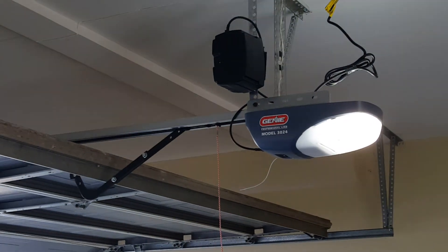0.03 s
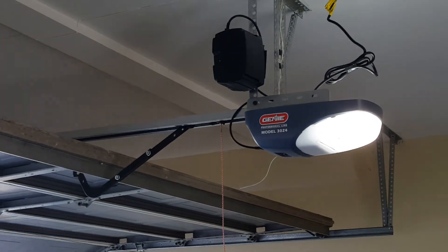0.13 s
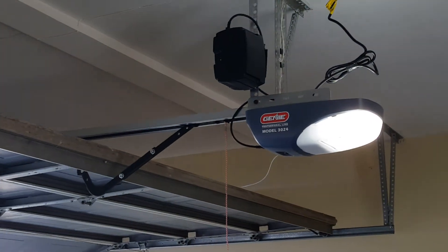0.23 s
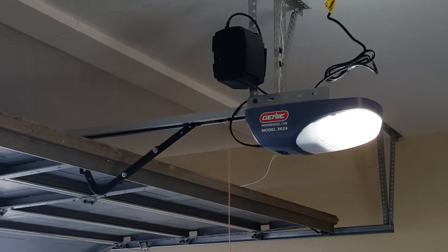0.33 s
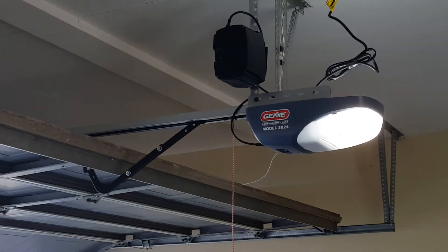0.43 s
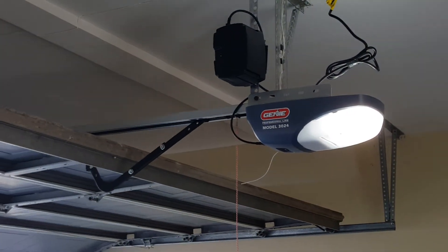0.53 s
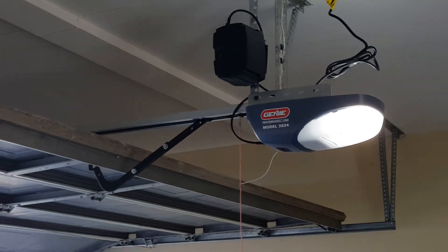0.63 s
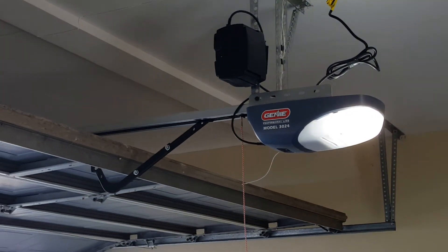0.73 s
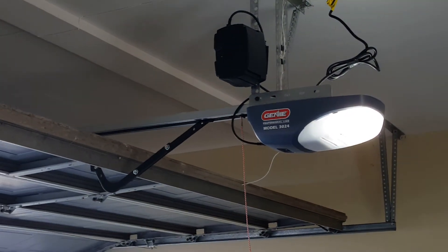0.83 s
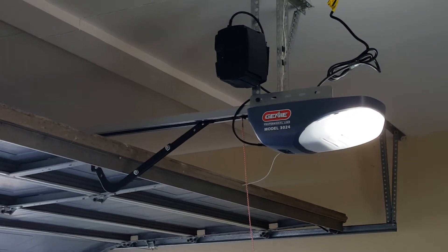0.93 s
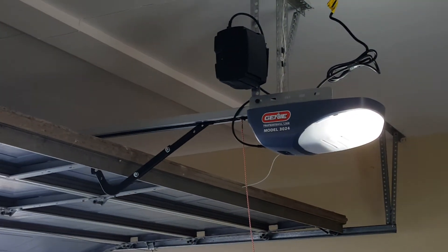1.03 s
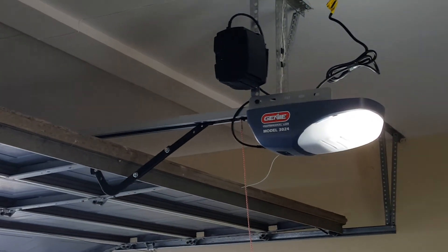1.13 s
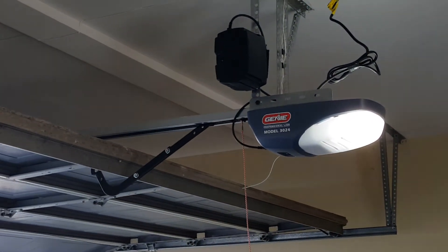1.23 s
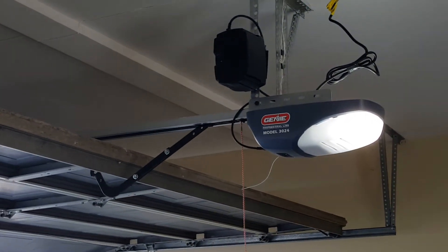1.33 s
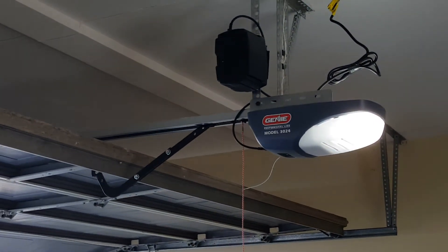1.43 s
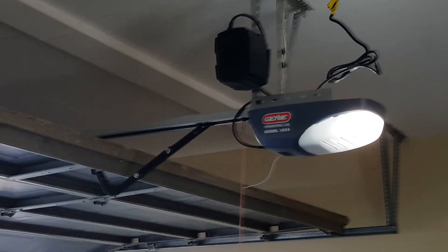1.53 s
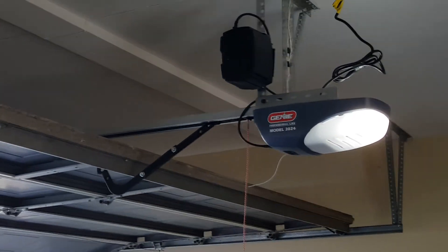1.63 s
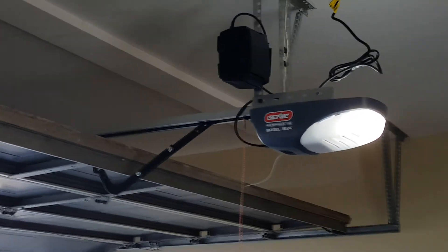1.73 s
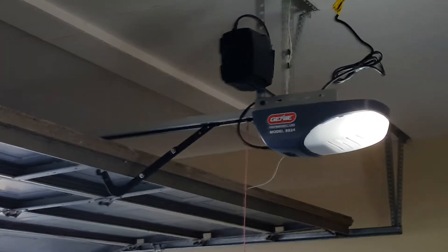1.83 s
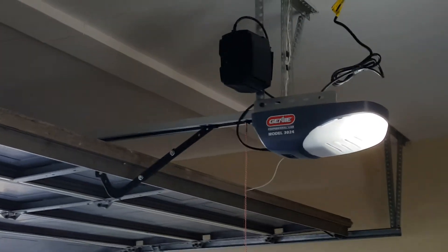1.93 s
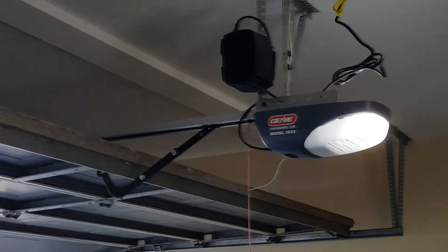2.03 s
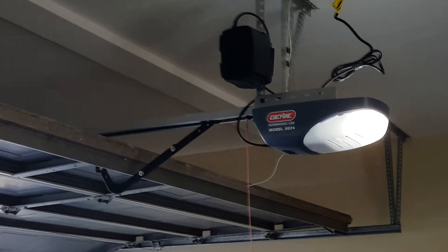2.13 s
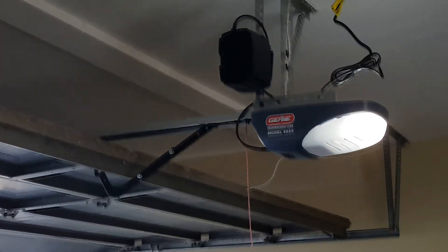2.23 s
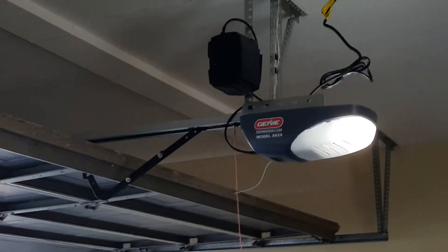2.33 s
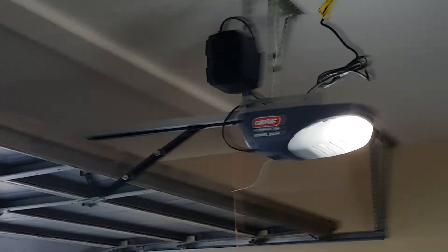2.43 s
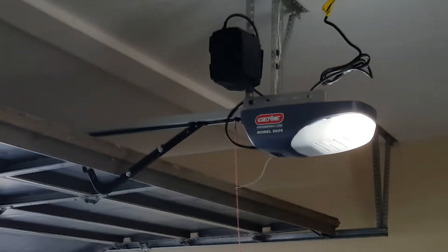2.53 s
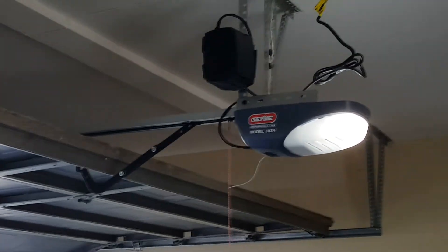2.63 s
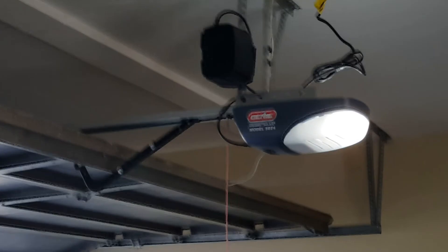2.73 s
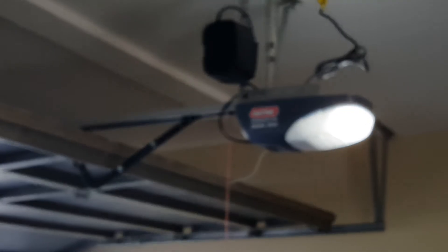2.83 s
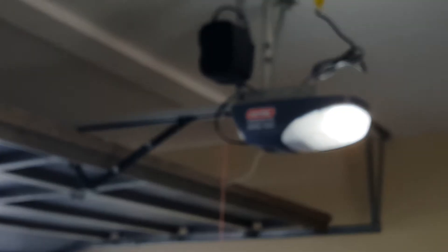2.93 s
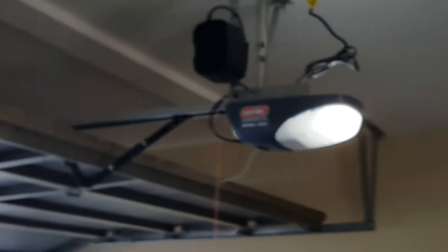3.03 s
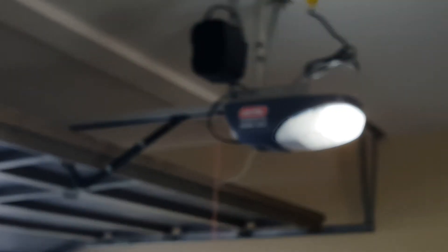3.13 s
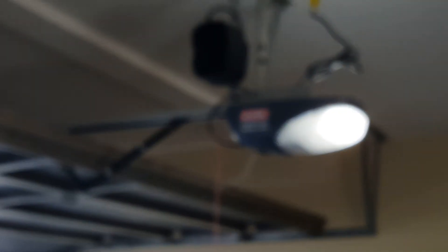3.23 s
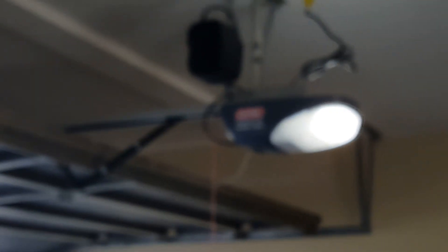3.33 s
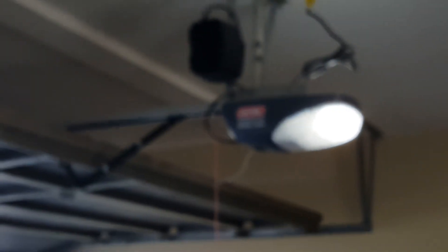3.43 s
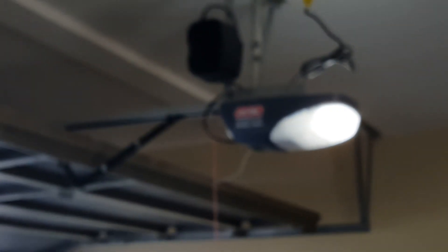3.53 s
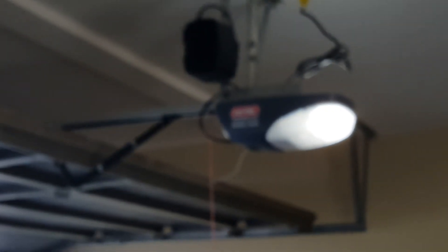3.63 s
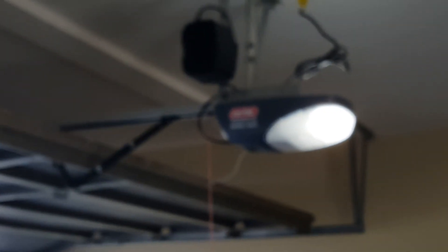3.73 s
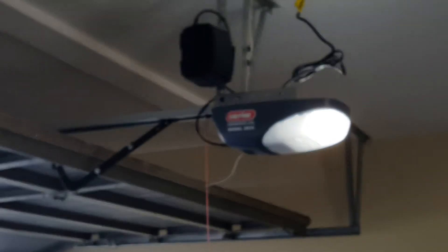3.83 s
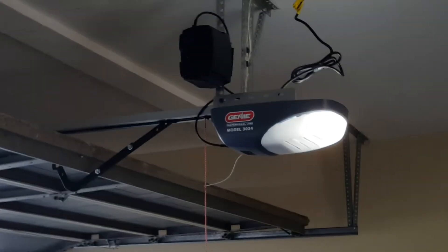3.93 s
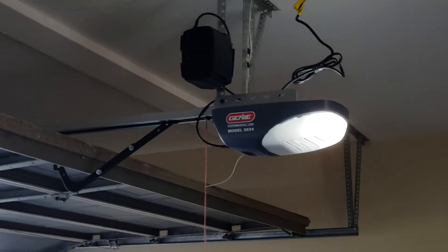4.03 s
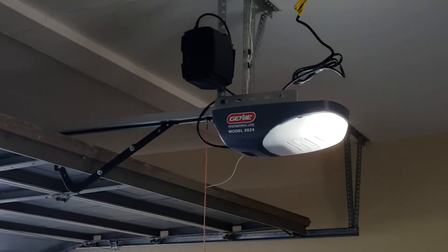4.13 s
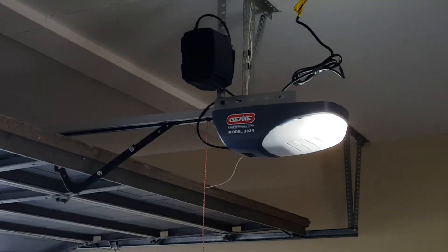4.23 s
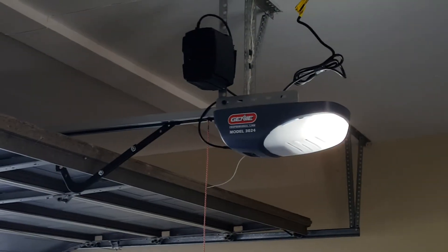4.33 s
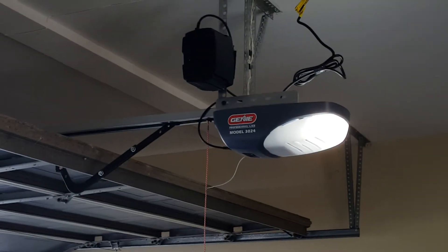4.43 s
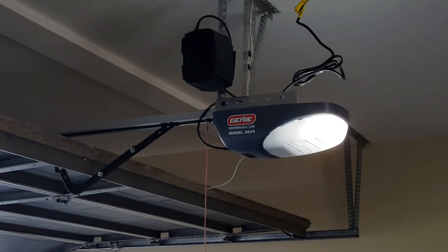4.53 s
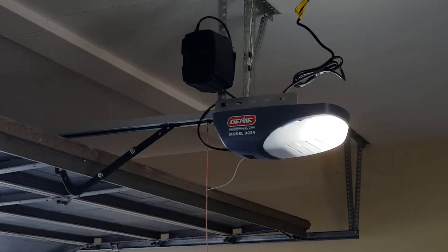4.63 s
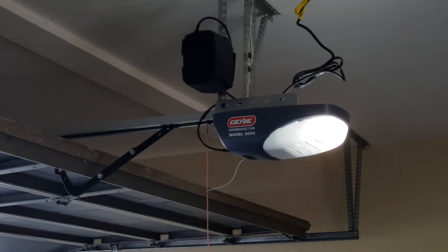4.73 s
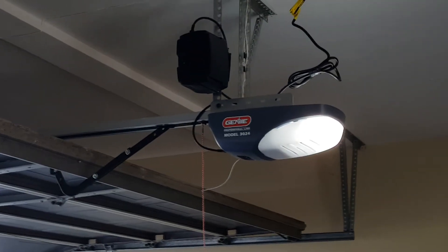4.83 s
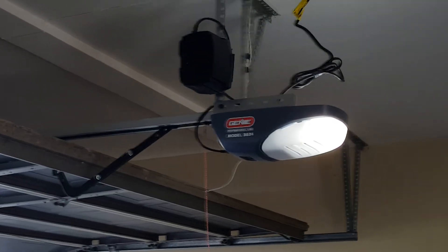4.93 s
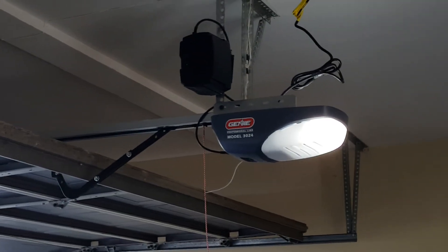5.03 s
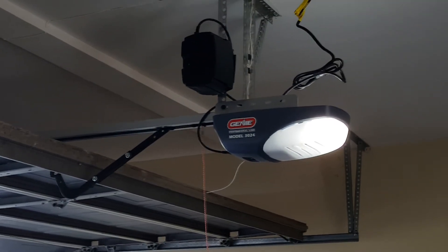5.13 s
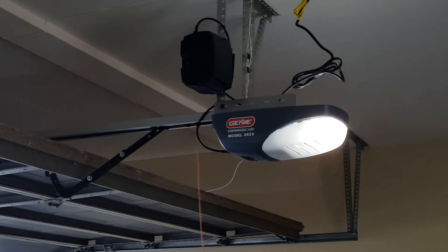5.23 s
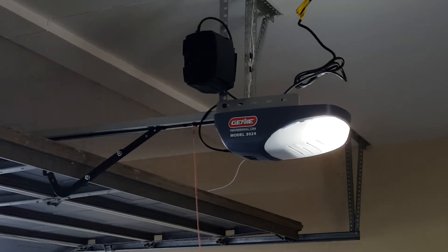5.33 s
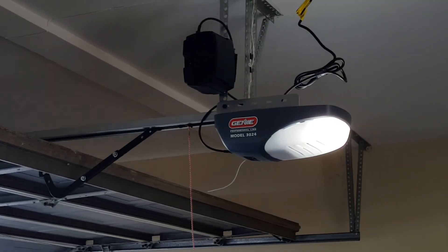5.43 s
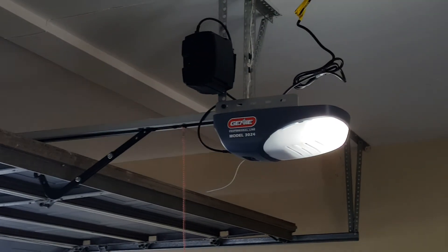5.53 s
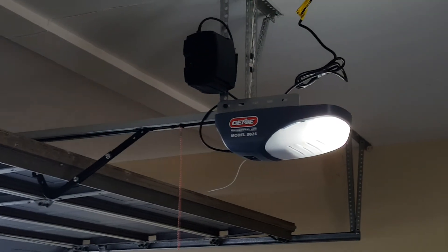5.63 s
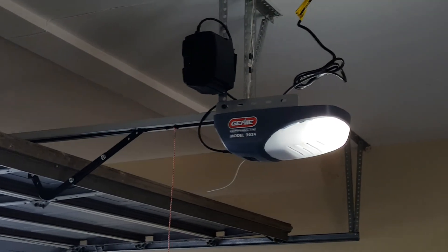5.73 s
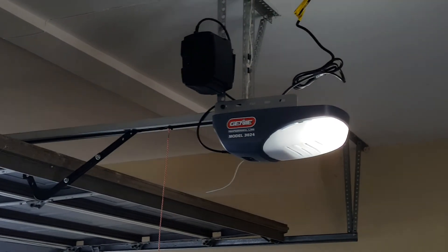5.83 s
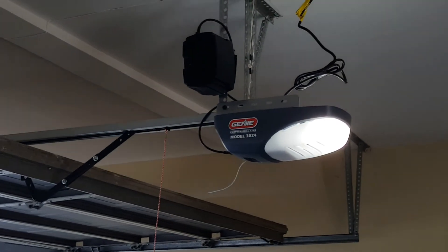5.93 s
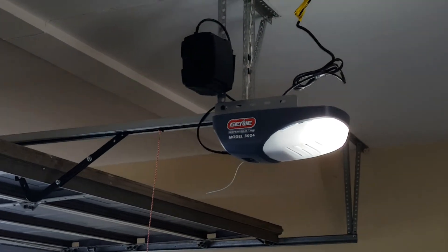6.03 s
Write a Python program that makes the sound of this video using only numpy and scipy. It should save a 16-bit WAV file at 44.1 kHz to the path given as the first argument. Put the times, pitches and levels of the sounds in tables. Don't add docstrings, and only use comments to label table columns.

```python
import sys
import numpy as np
from scipy import signal
from scipy.fft import rfft, irfft
from scipy.io import wavfile
from scipy.ndimage import uniform_filter1d

SR = 44100
rng = np.random.default_rng(int(sys.argv[2]) if len(sys.argv) > 2 else 0)


def transcribe(u):
    v = np.clip(np.atleast_2d(u).T, -1, 1)
    q = np.round(v * 32767).astype(np.int16)
    wavfile.write(sys.argv[1], SR, q)


def nominal_scale(level):
    x = np.asarray(level, float) / 20
    return 10 ** x


N = 267819
TIME = np.arange(N) / SR

# (t/s, slot rate f/Hz, whine level/dB)
MOTOR_RUNS = [
    [(0, 1662, -64), (.12, 1615, -67), (.22, 1570, -61), (.33, 1400, -68), (.44, 1360, -61.5),
     (.55, 1308, -65), (.66, 1272, -63), (.72, 1235, -76)],
    [(4.98, 1200, -81), (5.06, 1250, -89), (5.12, 1312, -65), (5.16, 1395, -57.5), (5.21, 1550, -56.5),
     (5.27, 1803, -57), (5.39, 1916, -53.5), (5.78, 1875, -53.5), (6.07, 1813, -56.5)],
]
# (multiple, level/dB)
SLOT_HARMONICS = [(1, -20), (1.5, -22), (2, -1), (3, -6.5), (4, -2), (5, -20)]
# (f/Hz, width/Hz, level/dB)
HOUSING_MODES = [(2000, 190, -26), (3300, 380, -7), (3980, 740, 2), (4260, 360, -1), (4900, 600, 1),
                 (5540, 460, -7.5), (6480, 1120, -4), (7037, 970, -5), (8440, 430, 8.5)]
# (f/Hz, level/dB)
CHOPPER_TONES = [(10002, -76.5)]


def motor():
    gate, (slot_hz, whine_db) = follow(MOTOR_RUNS)
    jitter = .0016 * (1900 / slot_hz) ** 4 * walk(60)
    phase = 2 * np.pi * np.cumsum(slot_hz * (1 + jitter)) / SR
    whine = sum(nominal_scale(db + 2.3 * walk(30)) * np.sin(k * phase) for k, db in SLOT_HARMONICS)
    housed = ring(ring(whine, HOUSING_MODES), HOUSING_MODES)
    chopper = sum(nominal_scale(db + 4) * np.sin(2 * np.pi * hz * TIME) for hz, db in CHOPPER_TONES)
    return gate * (nominal_scale(whine_db + 2.5) * housed + chopper)


# (t/s, level/dB)
DOOR_RUNS = [
    [(0, -44), (.23, -48), (.64, -50), (.75, -52), (.87, -55), (.9, -55)],
    [(4.95, -71), (5.04, -58), (5.115, -57), (5.136, -47), (5.28, -49), (5.4, -46.5), (5.8, -46),
     (6.07, -49.5)],
]
# (f/Hz, spectral level/dB per Hz)
DOOR_SPECTRUM = [(35, -63), (60, 30.5), (126, -11.5), (343, -4.5), (756, -12), (931, -8.5), (1050, -6),
                 (3270, -20), (3840, -18.5), (6410, -31), (8470, -25), (10400, -36), (15500, -58.5)]
# (f/Hz, width/Hz, level/dB)
PANEL_MODES = [(240, 12, 0), (412, 18, -3), (485, 165, 4.5), (753, 89, 6.5), (1083, 52, 4.5),
               (1263, 58, -2.5), (1816, 20, -35), (2020, 27, -18), (2847, 410, 9)]
# (t/s, level/dB, rise/s, fall/s, loss per brighter range/dB)
SECTION_JOLTS = [
    (0.002, -35, .002, 0.0034, -6),
    (.7, -44, 0.0074, 0.013, -8),
    (.75, -57, 0.0031, 0.022, -12),
    (0.885, -37.5, 0.0081, .02, -6),
    (.915, -32.5, 0.021, 0.023, -13),
    (0.962, -34.5, 0.0024, 0.021, -27),
    (1.02, -52, 0.033, 0.18, -22),
    (5.336, -42.5, 0.011, 0.018, -5.5),
    (5.872, -40, 0.0073, 0.042, -7),
    (5.99, -40.5, 0.047, 0.035, -6.5),
]


def door():
    gate, (roll_db,) = follow(DOOR_RUNS)
    sizes = np.minimum(rng.exponential(size=N), 3)
    ticks = rng.standard_normal(N) * nominal_scale(2.06 * sizes) * (rng.random(N) < .05)
    ticks = colour(ticks + ring(ticks, PANEL_MODES) * nominal_scale(-6.0), DOOR_SPECTRUM)
    shudder_db = .8 * walk(18)
    panel = unit(band(ticks, 290, 1500)) * nominal_scale(shudder_db + 1.4 * walk(30))
    rattle = -unit(band(ticks, 1500, 4500)) * nominal_scale(shudder_db + 1.2 * walk(30))
    scrape = unit(band(ticks, 5630, 11700)) * nominal_scale(shudder_db + 1.15 * walk(30))
    squeak = unit(band(ticks, 10900, 17900, order=3)) * nominal_scale(shudder_db)
    ranges = np.array([panel, rattle, scrape, squeak])
    out = gate * nominal_scale(roll_db) * (nominal_scale([0, -4.86, -8.5, -18.5]) @ ranges)
    brighter = np.arange(len(ranges)) ** 1.24
    for s, db, rise, fall, loss_db in SECTION_JOLTS:
        out += swell(s, rise, fall) * (nominal_scale(db + loss_db * brighter) @ ranges)
    return out


# (t/s, level/dB, f/Hz, rise/s, fall/s)
SLIDING_PARTS = [
    (5.09, -59.5, 3960, .04, .05),
    (5.8, -57, 4250, .015, .04),
    (5.8, -56, 5000, .015, 0.032),
]


def rubs():
    noise = rng.standard_normal(N)
    out = np.zeros(N)
    for s, db, hz, rise, fall in SLIDING_PARTS:
        out += nominal_scale(db) * swell(s, rise, fall) * unit(band(noise, hz / 1.06, hz * 1.06))
    return out


# (t/s, body level/dB, clack level/dB, clack f/Hz, sizzle level/dB)
CONTACT_KNOCKS = [(.697, -57, -49, 2977, -49.5), (0.752, -50, -44.5, 2960, -48),
                  (0.877, -44, -52, 2670, -49.5), (0.913, -36.5, -66, 1660, -55),
                  (.96, -54, -60, 1590, -62), (1.246, -59, -67, 2490, -76),
                  (2.341, -61.5, -57.5, 2620, -84), (4.657, -49.5, -40.5, 3300, -56),
                  (4.754, -51, -43.5, 2400, -41.5), (4.791, -38.5, -42.5, 2230, -52),
                  (4.841, -44.5, -45, 2700, -42.5), (5.123, -56, -44.5, 2600, -59),
                  (5.786, -64, -60, 4740, -65)]
# (f/Hz, spectral level/dB per Hz)
SIZZLE_SPECTRUM = [(2000, -39), (3500, -7), (4500, -6.5), (6500, -4.5), (8300, 1.5), (10000, -7.5),
                   (12900, -8), (14500, -19), (15800, -11)]


def knocks():
    out, t = np.zeros(N + SR), TIME[:SR // 4]
    chatter_s = 0.013
    for s, body_db, clack_db, clack_hz, sizzle_db in CONTACT_KNOCKS:
        burst = rng.standard_normal(len(t)) * np.exp(-t / chatter_s) * np.minimum(t * 1e3, 1)
        body = nominal_scale(body_db + 19) * band(burst, 283, 1400)
        clack = nominal_scale(clack_db + 16.5) * band(burst, clack_hz / 1.38, clack_hz * 1.08)
        sizzle = nominal_scale(sizzle_db + 12.5) * colour(burst, SIZZLE_SPECTRUM)
        at = int(s * SR)
        out[at:at + len(t)] += body + clack + sizzle
    return out[:N]


# (f/Hz, width/Hz, level/dB)
ARMATURE_MODES = [(2520, 40, -26), (5950, 20, -21), (7520, 20, -16)]


def ping():
    tap = np.zeros(N)
    tap[int(5.122 * SR)] = nominal_scale(20)
    return ring(tap, ARMATURE_MODES)


# (t/s, level/dB)
ROCKER_SNAPS = [
    (4.6572, -33.5),
    (4.6595, -35.5),
    (4.663, -43),
    (4.666, -42),
    (4.669, -33),
    (4.7912, -42),
    (4.796, -42),
    (4.802, -45),
]
# (f/Hz, width/Hz, level/dB)
BOX_MODES = [(300, 220, -12), (642, 88, 2), (889.7, 116, 1.5), (954, 72.5, -2), (1686, 93, 0),
             (3300, 130, 1), (5400, 1100, -22)]


def switch():
    snaps = np.zeros(N)
    for k, (s, db) in enumerate(ROCKER_SNAPS):
        snaps[int(s * SR)] = (-1) ** k * nominal_scale(db + 41.5)
    return ring(uniform_filter1d(snaps, size=5), BOX_MODES)


# (start t/s, length/s, from, to as ratios of the top note, level/dB)
SYLLABLE_GLIDES = [(-.016, 0.011, 1.06, 1.03, -6.5), (0, 0.011, 1.02, .98, 2.5),
                   (0.012, 0.0107, 1.1, .9, -9), (.009, .007, .74, 0.926, 1),
                   (0.018, 0.0202, .94, .87, -1.5), (.029, 0.0194, .44, .53, -15),
                   (.052, 0.0147, .56, 0.5, -16), (0.053, .008, .52, 1.2, -3.5),
                   (0.059, 0.0098, .93, .8, -8), (.066, .024, .93, .87, -7.5)]
# (t/s, length/s, from f/Hz, to f/Hz, level/dB)
FAR_CHIRPS = [
    (1.968, 0.016, 7100, 5700, -73),
    (3.088, .012, 9300, 7450, -76),
]


def bird():
    from_s, every_s, loudest_s, syllables = 3.322, .108, 4.02, 11
    song, slip = np.zeros(N), rng.standard_normal((syllables, len(SYLLABLE_GLIDES), 2))
    for k, slips in enumerate(slip):
        s = from_s + k * every_s
        top_hz = 5612 - 83 * k * every_s
        bend = 12.5 if s < loudest_s else 36
        db = -52.5 - bend * (s - loudest_s) ** 2
        for (start, length, first, last, note_db), (pitch, size) in zip(SYLLABLE_GLIDES, slips):
            hz = top_hz * (1 + .013 * pitch)
            add_glide(song, s + start, length, first * hz, last * hz, db + note_db + 1.85 * size)
    for chirp in FAR_CHIRPS:
        add_glide(song, *chirp)
    song = song * (1 + .4 * np.sin(2 * np.pi * 420 * TIME))
    t, t60_s = TIME[:SR // 2], 0.34
    sparse = rng.random((2, len(t))) < .03
    echoes = rng.standard_normal((2, len(t))) * sparse * nominal_scale(-60 * t / t60_s)
    echoes = echoes / np.sqrt(np.sum(echoes ** 2) / 2)
    wet = signal.fftconvolve(song[None], echoes, axes=1)[:, :N]
    return song * nominal_scale([[-1.5], [-7]]) + wet * nominal_scale([[1], [-1.5]])


def add_glide(song, s, length, from_hz, to_hz, db):
    u = np.linspace(0, 1, int(length * SR))
    phase = 2 * np.pi * np.cumsum(from_hz + (to_hz - from_hz) * u) / SR
    at = int(s * SR)
    song[at:at + len(u)] += nominal_scale(db) * np.sin(np.pi * u) * np.sin(phase)


# (t/s, level/dB, f/Hz)
FLUTTER = [
    [(0, -39, 100.8), (.15, -45.5, 125), (.23, -48, 109.1), (.3, -46.5, 200.5), (.55, -45, 180),
     (.71, -45, 105), (.86, -50.5, 130), (.92, -39.5, 99.9), (1.5, -67.5, 95.4)],
    [(3.5, -71, 78), (3.85, -54, 82.17), (4.2, -56, 87), (4.45, -51.5, 94.85), (4.72, -50.5, 95.06),
     (4.9, -52, 117.8), (5.15, -53, 95), (5.5, -48.5, 115), (6.07, -45, 110)],
]
# (t/s, peak level/dB, length/s, left minus right/dB)
FLUTTER_EDDIES = [(0.31, -39, 0.0097, 1), (1.152, -58.5, 0.034, -6), (1.296, -48.5, 0.018, -1),
                  (1.442, -57, 0.028, -3), (3.698, -58, 0.047, -17.5), (3.996, -45.5, .05, -12.5),
                  (4.233, -48, .03, -10.5), (4.376, -47.5, .04, 19), (4.467, -49.5, 0.021, 12),
                  (4.543, -48, 0.08, -3.5), (4.789, -42, 0.029, -24), (4.995, -38.5, 0.077, -9),
                  (5.449, -43.5, .05, 0.5), (5.628, -42.5, .035, -8.5)]
# (t/s, peak level/dB, f/Hz, left minus right/dB)
SINGLE_BUFFETS = [(0.31, -31.5, 230, -3), (0.403, -29.5, 240, -1), (0.932, -36.5, 127, 3.5),
                  (0.969, -55, 142, -1), (3.7, -44.5, 67, -22), (3.752, -47, 95, -18),
                  (3.873, -46.5, 86, -19), (3.977, -33.5, 95.5, -5), (4.015, -38, 120.2, -6),
                  (4.05, -36.5, 87, 14.5), (4.231, -39, 93, -20), (4.375, -49, 101.6, 14),
                  (4.797, -42, 89, -27), (4.829, -36, 138, -19), (4.966, -41, 109.1, 1),
                  (5.026, -33, 167, -17), (4.792, -37, 279.8, -9), (5.021, -37, 300, 4)]


def draught():
    gate, (db, hz) = follow(FLUTTER)
    gust = TIME > 2.5
    shared = np.where(gust, 0.27, 0.98)
    size = gate * nominal_scale(db) * balance(np.where(gust, -4, -0.5))
    for s, peak_db, length, lean_db in FLUTTER_EDDIES:
        size = size + np.exp(-((TIME - s) / length) ** 2) * nominal_scale(peak_db) * balance(lean_db)
    phase = 2 * np.pi * np.cumsum(hz) / SR
    sway = uniform_filter1d(uniform_filter1d(rng.standard_normal((2, 3, N)), size=230), size=230)
    flutter = unit(sway[0] * np.cos(phase) + sway[1] * np.sin(phase))
    left, right, both = flutter * [nominal_scale(1.12 * walk(25)) for _ in range(3)]
    out = nominal_scale(-2.5) * size * (np.sqrt(1 - shared) * np.array([left, right]) + np.sqrt(shared) * both)
    starts = rng.random((len(SINGLE_BUFFETS), 2))
    for (s, peak_db, pitch_hz, lean_db), start in zip(SINGLE_BUFFETS, starts):
        cycles = (TIME - s) * pitch_hz
        puff = np.exp(-(cycles / 0.69) ** 2) * np.cos(2 * np.pi * (cycles + start[:, None]))
        out += puff * nominal_scale(peak_db) * balance(lean_db)
    return out


# (f/Hz, spectral level/dB per Hz)
STREET_SPECTRUM = [(15, -77), (25, -23), (55, 0.5), (107, -7), (133, 1), (165, -12.5), (200, -1.5),
                   (307, -9.5), (513, -13), (557, -11), (812, -9), (1360, -16), (2330, -29.5),
                   (4820, -36.5), (15800, -51.5)]
# (t/s, level/dB)
STREET_BRIGHTNESS = [(1.3, 0), (1.5, 1), (1.65, 5.5), (1.85, 2), (2.1, 1.5), (2.7, 0.5), (3.1, 2.5),
                     (3.4, 1), (4.65, 4.5)]
# (f/Hz, width/Hz, level/dB)
DISTANT_HUMS = [(83.4, 27, -70.5), (197, 12.3, -72), (403.7, 3.7, -80.5), (521, 21, -76.5)]


def air():
    noise = np.array([colour(side, STREET_SPECTRUM) for side in pair(N)])
    swell_db, bright_db = 0.4 * walk(0.85), np.interp(TIME, *np.transpose(STREET_BRIGHTNESS))
    traffic = np.zeros((2, N))
    for hz in 20 * 2. ** np.arange(10):
        level_db = swell_db + 2.9 * walk(6.04) + bright_db * min(hz / 2500, 1)
        traffic += band(noise, hz, 2 * hz, order=1) * nominal_scale(level_db)
    hum = np.zeros(N)
    for hz, width, db in DISTANT_HUMS:
        hum += nominal_scale(db) * unit(ring(rng.standard_normal(N), [(hz, width, 0)]))
    return unit(traffic) * nominal_scale(-60) + hum


# (f/Hz, t60/s)
GARAGE_T60 = [(90, .9), (250, 0.37), (700, 0.45), (2000, 0.44), (5000, 0.43), (11000, 0.28)]


def garage(x, direct_db):
    t = TIME[:SR]
    noise, tail = pair(len(t)), 0
    for hz, t60 in GARAGE_T60:
        tail = tail + unit(band(noise, hz / 1.804, hz * 1.59)) * np.sqrt(hz / t60) * nominal_scale(-60 * t / t60)
    tail = tail * (1 - np.exp(-t / 0.0025))
    tail = tail / np.sqrt(np.sum(tail ** 2) / 2)
    return nominal_scale(direct_db) * x + signal.fftconvolve(x[None], tail, axes=1)[:, :N]


# (f/Hz, likeness of left and right)
CORRELATION = [(60, 0.99), (130, 0.99), (290, 0.72), (640, 0.45), (1410, -0.56), (3100, 0.23),
               (6820, -0.74), (15000, -0.29)]


def pair(size):
    like = np.clip(along(CORRELATION, np.arange(size // 2 + 1) * SR / size), -1, 1)
    mid, side = rfft(rng.standard_normal((2, size))) * np.sqrt([(1 + like) / 2, (1 - like) / 2])
    return irfft([mid + side, mid - side], size)


def balance(lean_db):
    return nominal_scale(np.array([[1], [-1]]) * lean_db / 2)


def along(table, hz):
    at, value = np.transpose(table)
    return np.interp(np.log(np.maximum(hz, 1)), np.log(at), value)


def colour(x, table, tilt=1):
    size = 8192
    cep = irfft(tilt * along(table, np.arange(size // 2 + 1) * SR / size) * np.log(10) / 20)
    cep[1:size // 2] *= 2
    cep[size // 2 + 1:] = 0
    return signal.fftconvolve(x, irfft(np.exp(rfft(cep))))[:len(x)]


def band(x, lo_hz, hi_hz, order=2):
    sos = signal.butter(order, [lo_hz, min(hi_hz, .49 * SR)], "bandpass", fs=SR, output="sos")
    return signal.sosfilt(sos, x)


def ring(x, peaks):
    return sum(nominal_scale(db) * signal.lfilter(*signal.iirpeak(hz, hz / max(width, 2), SR), x) for hz, width, db in peaks)


def unit(x):
    return x / np.sqrt(np.mean(x ** 2))


def walk(rate):
    k = int(SR / rate)
    held = np.repeat(rng.standard_normal(4000), k)[:N]
    return 1.305 * uniform_filter1d(uniform_filter1d(held, k), k)


def follow(spans):
    s, *columns = np.transpose(np.concatenate(spans))
    gate = sum((TIME >= rows[0][0]) & (TIME <= rows[-1][0]) for rows in spans)
    return uniform_filter1d(1. * gate, size=600), [np.interp(TIME, s, c) for c in columns]


def swell(s, rise, fall):
    return np.exp(np.where(TIME < s, (TIME - s) / max(rise, .001), (s - TIME) / max(fall, .001)))


def scene():
    running = garage(door(), -8) * nominal_scale(-0.47) + garage(motor(), -4.5) * nominal_scale(-3.0)
    contacts = garage(switch(), -7.0) * nominal_scale(-3.5) + garage(knocks() + ping(), -6.0) * nominal_scale(-2.0)
    outside = air() + draught() + bird()
    return running + contacts + rubs() + outside


def roll_off(x):
    return signal.sosfilt(signal.butter(12, 16460, fs=SR, output="sos"), x)


# (f/Hz, left minus right/dB)
MICROPHONE_LEAN = [(60, 1.5), (110, 3.5), (200, 1.5), (380, 2), (700, 1.5), (1290, 3), (2380, 7),
                   (4400, 4.5), (8120, 5), (15000, -4)]


def record(dry):
    x = signal.sosfilt(signal.butter(2, 38, "highpass", fs=SR, output="sos"), dry)
    x = np.array([colour(x[0], MICROPHONE_LEAN, tilt=0.77), colour(x[1], MICROPHONE_LEAN, tilt=-0.38)])
    x = x + nominal_scale(-76.5) * rng.standard_normal(x.shape)
    x = signal.sosfilt(signal.ellip(10, .2, 70, 15780, fs=SR, output="sos"), x)
    return roll_off(x)


dry = scene()
out = record(dry)
transcribe(out)
```